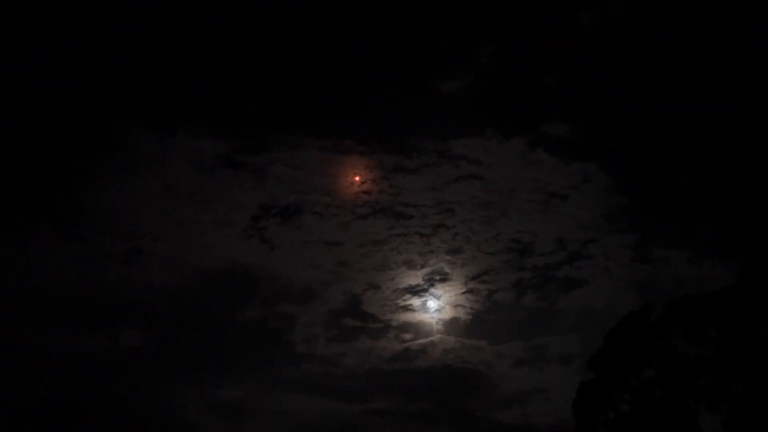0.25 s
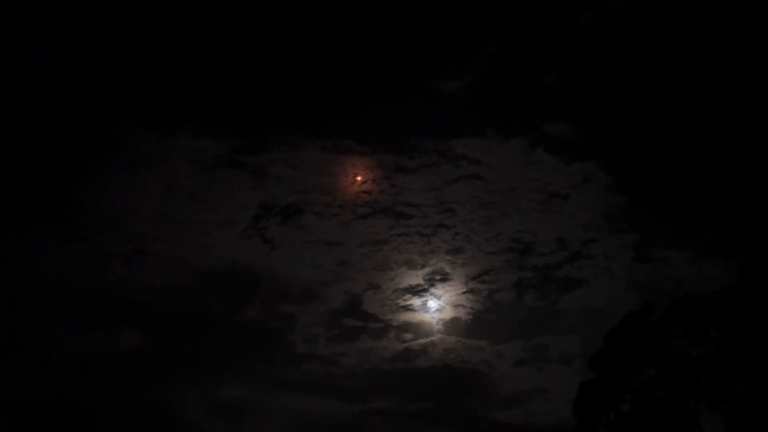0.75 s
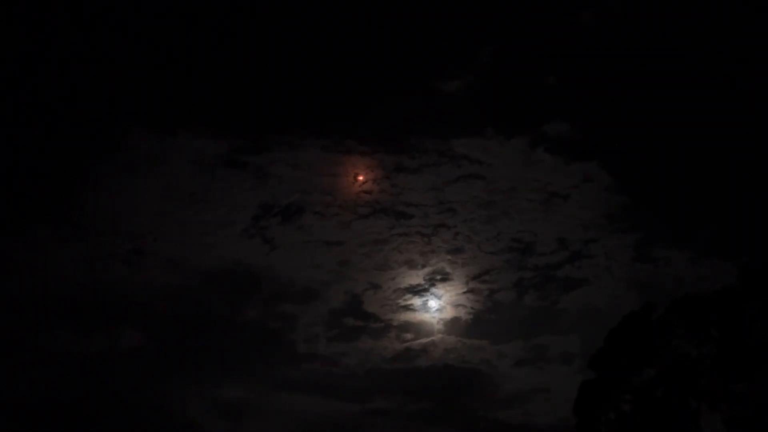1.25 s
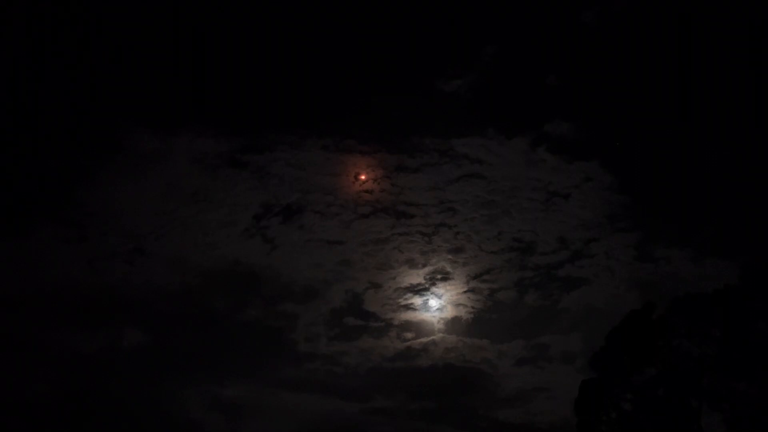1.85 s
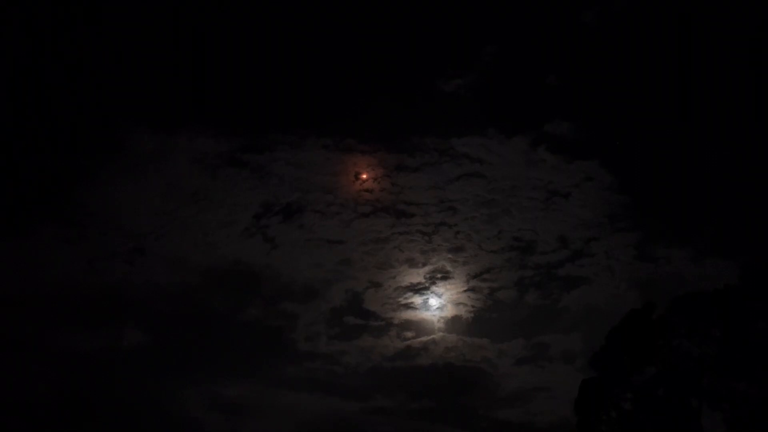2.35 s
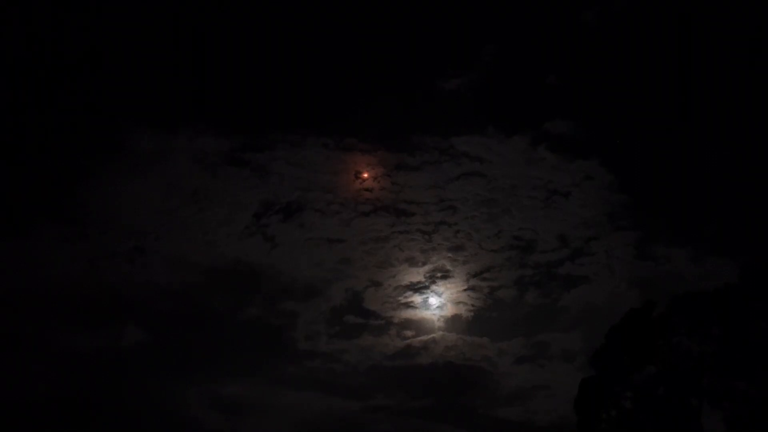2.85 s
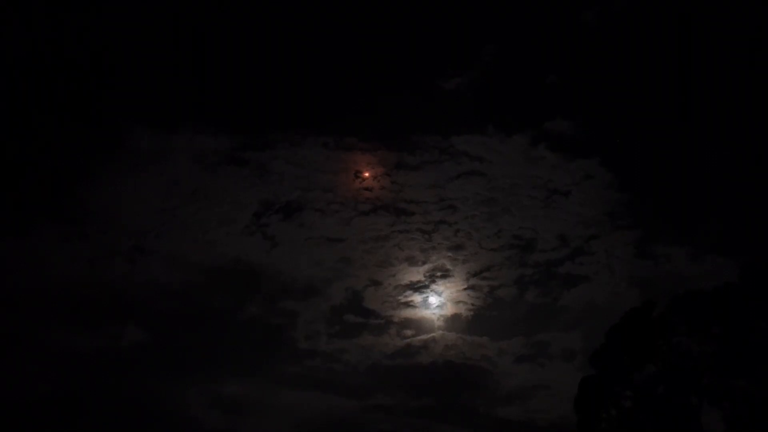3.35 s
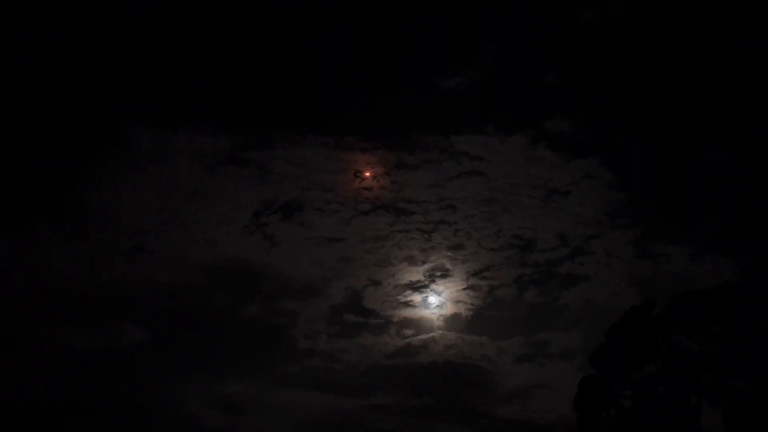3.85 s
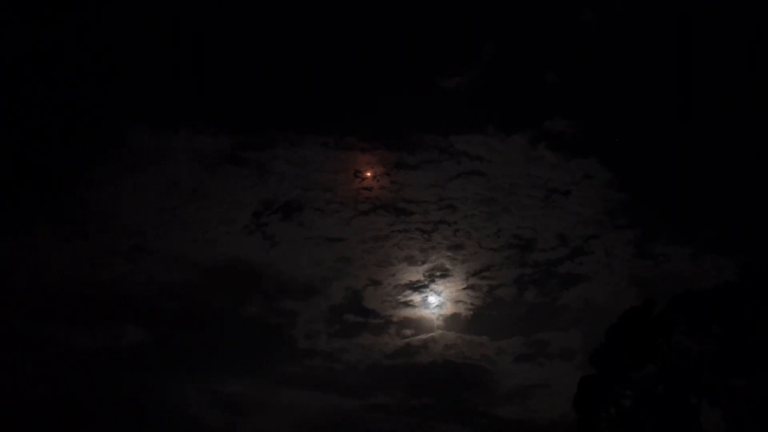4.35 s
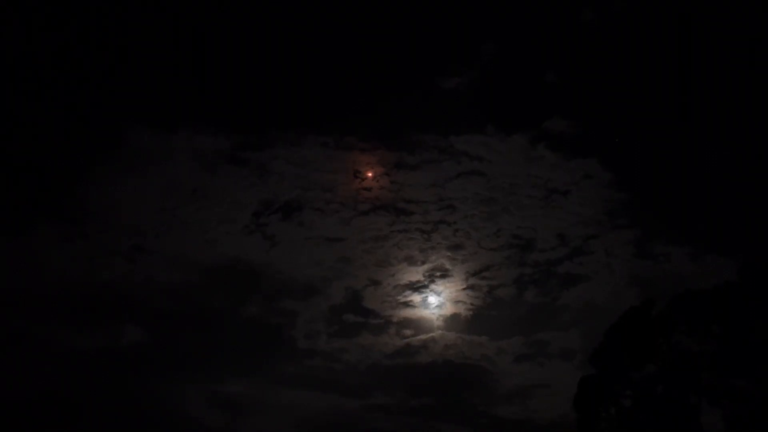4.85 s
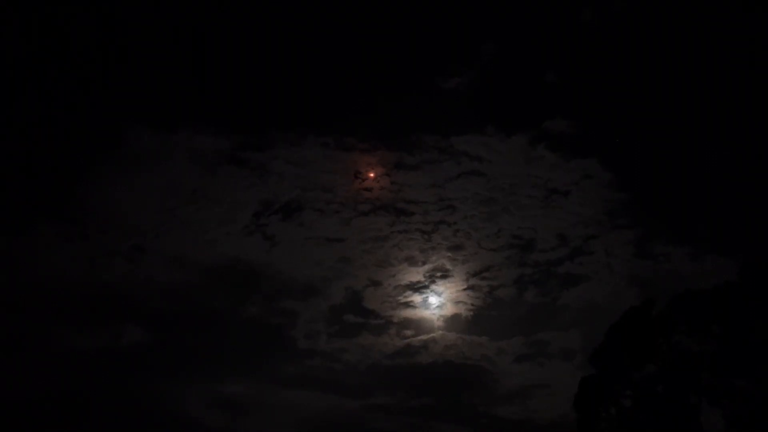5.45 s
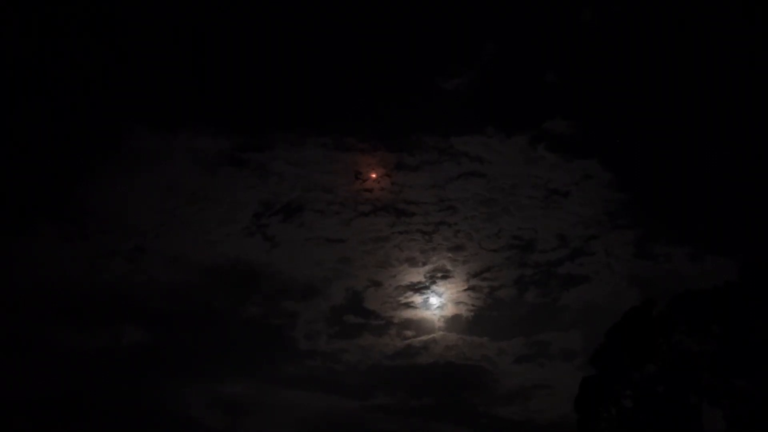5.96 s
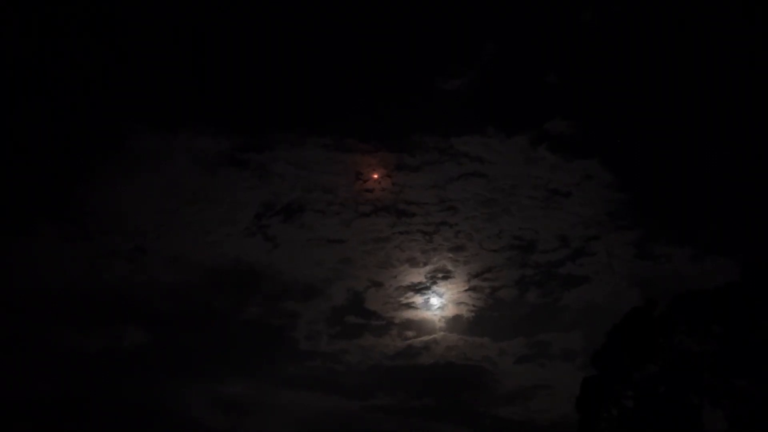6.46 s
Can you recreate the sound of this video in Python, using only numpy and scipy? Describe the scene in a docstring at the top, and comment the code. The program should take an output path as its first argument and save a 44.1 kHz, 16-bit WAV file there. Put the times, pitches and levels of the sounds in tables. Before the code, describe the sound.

A far-off rocket rumbles deep and lumpy through the night, popping and thudding, with faint crickets, thin hiss and a few small close ticks.

```python
"""Distant rocket on a still night

A rocket climbs far away: random exhaust shocks, dulled by miles of air, sum to a deep, lumpy rumble.
The strongest stand out as pops (short pressure swings) and thuds (longer, deeper ones).
Filtered noise makes the faint hiss, steady sines the hum; two crickets chirp in short sine strokes.
A trilling insect is narrow-band noise, and a single falling peep is a gliding sine with breathy noise.
Small ticks close to the microphone are sums of decaying tones; faint scuffs are bursts of noise."""
import sys
import numpy as np
from scipy import signal
from scipy.fft import rfft, irfft
from scipy.io import wavfile
from scipy.ndimage import uniform_filter1d

SR = 44100
rng = np.random.default_rng(int(sys.argv[2]) if len(sys.argv) > 2 else 0)


def waveform_to_disk(signal):
    """Save audio, clipped to [-1, 1], as 16-bit WAV at the path in sys.argv[1]."""
    frames = np.transpose(np.atleast_2d(signal))
    scaled = np.clip(frames, -1, 1) * 32767
    samples = np.round(scaled).astype(np.int16)
    wavfile.write(sys.argv[1], SR, samples)


N = 295911
TIME = np.arange(N) / SR  # [s]


def from_db(db):
    """Level to amplitude: 20 dB is a factor of ten."""
    return 10 ** (np.asarray(db) / 20)


def rms_one(x):
    """Normalisation: scale to unit mean power."""
    return x / np.sqrt(np.mean(x ** 2) + 1e-20)


def in_time(rows):
    """Linear interpolation: read each column of a time curve sample by sample."""
    s, *columns = np.transpose(rows)
    return [np.interp(TIME, s, column) for column in columns]


def at_hz(points, hz):
    """Spectral interpolation: read a table on a logarithmic frequency axis."""
    freqs, values = np.transpose(points)
    return np.interp(np.log(np.maximum(hz, 1)), np.log(freqs), values)


def coloured(x, gain_at):
    """Spectral shaping: multiply the spectrum by a gain and restore unit power."""
    spectrum = rfft(x) * gain_at(np.fft.rfftfreq(N, 1 / SR))
    return rms_one(irfft(spectrum, N))


def narrow_noise(hz, width_hz):
    """Band-limited noise: two independent channels under one Gaussian spectrum."""
    bell = lambda f: np.exp(-2 * ((f - hz) / width_hz) ** 2)
    return coloured(rng.standard_normal((2, N)), bell)


def panned(x, pan_db):
    """Interaural level difference: place a sound by left minus right level."""
    return x * from_db([[pan_db / 2], [-pan_db / 2]])


def delayed(x, lag_s):
    """Propagation delay: the same sound a moment later."""
    return np.interp(TIME - lag_s, TIME, x)


def swell(start, length):
    """Half-sine envelope: one smooth rise and fall of height 1."""
    return np.sin(np.pi * np.clip((TIME - start) / length, 0, 1))


def swing(s, hz, width_s):
    """Gaussian wave packet: one rounded swing of pressure, up and down alike."""
    return np.exp(-((TIME - s) / width_s) ** 2) * np.sin(2 * np.pi * hz * (TIME - s))


def clicks(s, db):
    """Impulse excitation: single-sample pulses at the given times and levels."""
    out = np.zeros(N)
    out[(s * SR).astype(int)] = from_db(db)
    return out


def ring(strikes, hz, t60):
    """Damped resonator: a unit impulse starts a decaying sine of initial height 1."""
    r = from_db(-60 / (t60 * SR))
    w = 2 * np.pi * hz / SR
    # the tiny offset keeps the filter clear of denormal numbers
    return signal.lfilter([0, np.sin(w)], [1, -2 * r * np.cos(w), r * r], strikes + 1e-18)


def evened(x, span_s):
    """Envelope normalisation: hold the slow level at 1 and keep the fast flutter."""
    size = max(int(span_s * SR), 2)
    power = uniform_filter1d(uniform_filter1d(x ** 2, size), size)
    return x / np.sqrt(power + 1e-9)


# slow course of the rumble in three registers:
# (time [s], relative deep boom level [dB], relative roll level [dB], relative dull crackle level [dB])
RUMBLE_COURSE = [(0.0, -18.5, -23, -35), (0.45, -25, -26, -35.5), (0.75, -24.5, -27.5, -32.5),
                 (1.15, -29, -27, -35), (1.9, -27, -28.5, -37), (2.55, -27.5, -29.5, -34.5),
                 (2.95, -25.5, -29, -37.5), (3.85, -26.5, -29.5, -38), (4.6, -28.5, -29.5, -39.0),
                 (5.3, -27, -28, -39.5), (6.71, -25, -31.5, -38.5)]
# the heaviest booms stand out: (centre time [s], lift of the deep boom [dB], length [s])
BOOM_LIFTS = [(0.068, 0.5, 0.1), (0.467, 8, 0.066), (0.754, 6, 0.078), (1.03, 1, 0.15), (1.153, 5.5, 0.055),
              (1.37, 6, 0.067), (1.583, 7.5, 0.16), (2.403, 4.5, 0.05), (2.555, 4, 0.055),
              (2.657, 7.5, 0.053), (3.344, 7.5, 0.17), (4.204, 3.5, 0.22), (5.544, 4, 0.042),
              (6.465, 3.5, 0.11), (6.644, 5.5, 0.11)]
# brief dips; negative values lift:
# (centre time [s], deep boom dip [dB], roll dip [dB], dull crackle dip [dB], length [s])
LULL_DIPS = [(0.179, 8.5, 9, 4, 0.1), (0.937, -3, 11, 0, 0.082), (1.278, -1.5, 9.5, -0.5, 0.2),
             (1.495, 19.5, 0, 2.5, 0.096), (1.783, 11, -0.5, -0.5, 0.11), (1.871, 1, 6.5, -0.5, 0.041),
             (1.958, 16, -2.5, 0.5, 0.074), (2.105, 1, -0.5, 7, 0.076), (2.862, 0.5, 6.5, -0.5, 0.1),
             (3.483, 7, 3, 0, 0.18), (4.068, 12, -2, 2, 0.16), (4.29, 14, 5.5, -0.5, 0.077),
             (4.456, 1.5, -0.5, 3, .06), (4.718, 6, 3, 4, 0.07), (5.043, 4.5, 4, 0, 0.16),
             (5.288, 1, 8.5, 1.5, .11), (5.728, 14, -0.5, 1, 0.068), (5.785, 0.5, 2, 5, 0.061),
             (5.964, 10, -0.5, -1, 0.1), (6.12, 1, 7, 1, 0.066), (6.4, 11, 7, 6, 0.067),
             (6.568, 4.5, 5.5, -0.5, 0.098)]
# a thud swallows the small shocks around it: greatest dip of the roll [dB], length [s]
SWALLOW_DB, SWALLOW_S = 4, .045


def rumble_levels():
    """Level modulation: slow curves in dB, lifted by booms and dented by lulls and around thuds."""
    levels_db = np.array(in_time(RUMBLE_COURSE))
    for s, lift_db, length in BOOM_LIFTS:
        levels_db[0] += lift_db * swell(s - length / 2, length)
    for s, _ in THUD_EVENTS:
        levels_db[1] -= SWALLOW_DB * swell(s - SWALLOW_S / 2, SWALLOW_S)
    for s, *dips_db, length in LULL_DIPS:
        levels_db = levels_db - np.outer(dips_db, swell(s - length / 2, length))
    return levels_db


# spectrum of an exhaust shock after its way through the air:
# (frequency [Hz], relative spectral level [dB per Hz])
SHOCK_SPECTRUM = [(25, -20.5), (36, -8), (47, -0.5), (57, 6.5), (68, -1), (90, -3), (106, -1.5),
                  (130, -9.5), (195, -14), (235, -22), (280, -30), (400, -39.5), (600, -63.5),
                  (1200, -93.5)]
BOOM_TOP_HZ, ROLL_TOP_HZ = 72, 140  # upper edges of the deep boom and of the roll
ROCKET_LAG_S = .00023  # the rumble reaches the right channel this much sooner


def rocket(shocks_per_s, spread_db, even_s, lag_s, pan_db, trim_db):
    """Shot noise: uneven shocks arrive at random; turbulent air makes long and short waves surge apart."""
    sizes = from_db(spread_db * np.minimum(rng.exponential(1, N), 4))
    shocks = sizes * (rng.random(N) < shocks_per_s / SR)
    below = lambda f, edge: 1 / (1 + (f / edge) ** 12)
    shares = [lambda f: below(f, BOOM_TOP_HZ),
              lambda f: below(f, ROLL_TOP_HZ) - below(f, BOOM_TOP_HZ),
              lambda f: 1 - below(f, ROLL_TOP_HZ)]
    roar = 0
    for share, level_db, own_db, span_s in zip(shares, rumble_levels(), trim_db, even_s):
        # the factor -1j makes each shock one swing of pressure, up and down alike
        gain = lambda f: -1j * share(f) * from_db(at_hz(SHOCK_SPECTRUM, f))
        waves = coloured(shocks - shocks.mean(), gain)
        roar = roar + from_db(level_db + own_db) * evened(waves, span_s)
    return panned(np.array([delayed(roar, lag_s), roar]), pan_db)


# spectrum of the night air: (frequency [Hz], relative spectral level [dB per Hz])
AIR_SPECTRUM = [(100, -7.5), (450, 2.5), (800, -2), (1300, -6.5), (1800, -9), (2800, -15), (3850, -14),
                (4750, -22), (5300, -15.5), (5850, -20), (6500, -18.5), (7400, -23), (9500, -26.5),
                (10300, -44), (11500, -31), (14000, -48.5)]
# left-right likeness of the air: (frequency [Hz], correlation [-1 to 1])
AIR_LIKENESS = [(200, 0.83), (470, 0.3), (900, 0.16), (1800, -0.48), (3700, 0.38), (7300, .2),
                (12000, 0.19)]
# course of the breeze, used about its mean: (time [s], relative level [dB])
BREEZE_COURSE = [(0.1, -64), (1.02, -66), (3.43, -63), (4.14, -63.5), (4.61, -62.5), (6.6, -65)]


def night_air(level_db):
    """Partly coherent field: hiss most alike in both ears in the bass; the breeze moves its lower part."""
    alike = lambda f: np.clip(at_hz(AIR_LIKENESS, f), -.99, .99)
    # the powers of sum and difference signals set the correlation of the channels
    gains = lambda f: from_db(at_hz(AIR_SPECTRUM, f)) * np.sqrt([1 + alike(f), 1 - alike(f)])
    mid, side = coloured(rng.standard_normal((2, N)), gains)
    hiss = np.array([mid + side, mid - side])
    low = signal.sosfiltfilt(signal.butter(2, 1800, fs=SR, output="sos"), hiss)
    breeze_db, = in_time(BREEZE_COURSE)
    breeze_gain = from_db(breeze_db - breeze_db.mean())
    return from_db(level_db) * (hiss + low * (breeze_gain - 1))


def rustle(flutter_hz, flutter_db):
    """Random amplitude modulation: a slow noise in dB makes the hiss flicker slightly."""
    flutter = coloured(rng.standard_normal(N), lambda f: np.exp(-(f / flutter_hz) ** 2))
    return from_db(flutter_db * flutter)


# tones of far machinery: (frequency [Hz], relative level [dB])
HUM_TONES = [(771, -73.5), (1067, -79.5), (1541, -83)]


def hum(width_hz, waver, level_db):
    """Narrow-band beating: thin machine tones waver with noise at their own pitch."""
    out = 0
    for hz, db in HUM_TONES:
        tone = np.sqrt(2) * np.sin(2 * np.pi * hz * TIME)
        out = out + from_db(db + level_db) * (tone + waver * narrow_noise(hz, width_hz))
    return out


# course of the trilling insect: (time [s], level of the evened buzz [dB])
TRILL_COURSE = [(0, -74.5), (1.5, -73), (2.4, -73.5), (3.15, -72), (3.18, -110)]


def trill(hz, width_hz, core_hz, core_width_hz, core_db):
    """Narrow-band noise: a far, fine buzz around a thin core grows slightly and stops abruptly halfway."""
    level_db, = in_time(TRILL_COURSE)
    buzz = narrow_noise(hz, width_hz) + from_db(core_db) * narrow_noise(core_hz, core_width_hz)
    return from_db(level_db) * evened(buzz, span_s=0.14)


# the nearer cricket's chirps: (time [s], relative level [dB])
NEAR_CHIRPS = [(.083, -74.5), (.448, -71), (.811, -76.5), (1.172, -74.5), (1.527, -74.5), (1.877, -73),
               (2.27, -76), (2.628, -73.5), (3.005, -73.5), (3.377, -73.5), (3.718, -74), (4.075, -76),
               (4.42, -77), (4.765, -75), (5.24, -75.5), (5.52, -85.5), (5.773, -78)]


def cricket(chirps, hz, pan_db, stroke_s, gap_s, sag_hz, scatter_hz, uneven_db, rasp, echo_db, echo_t60_s):
    """Stridulation: a chirp is two wing strokes, raspy sines of sagging pitch, blurred by scattered echoes."""
    strokes = [(s + delay, db) for s, db in chirps for delay in (0, gap_s)]
    out = np.zeros(N + SR)
    t = np.arange(int(stroke_s * SR)) / SR
    for (s, db), (louder, sharper) in zip(strokes, rng.standard_normal((len(strokes), 2))):
        # t * pitch is the phase, so halving the sag gives the full fall in pitch
        pitch = hz + scatter_hz * sharper + sag_hz * (1 - t / stroke_s) / 2
        stroke = np.sin(np.pi * t / stroke_s) * np.sin(2 * np.pi * t * pitch)
        start = int(s * SR)
        out[start:start + len(t)] += from_db(db + uneven_db * louder) * stroke
    song = out[:N] * (1 + rasp * narrow_noise(60, 90)[0])
    scatter = rng.standard_normal((2, SR // 2)) * from_db(-60 * TIME[:SR // 2] / echo_t60_s)
    echoes = signal.fftconvolve(song[None], scatter)[:, :N]
    return panned(song + from_db(echo_db) * song.std() * rms_one(echoes), pan_db)


# the steepest shocks: (time [s], relative body level [dB], steep front level [dB])
POP_EVENTS = [(0.085, -30.5, -35), (0.201, -37, -34), (0.301, -28.5, -43.5), (.609, -24, -45.5),
              (0.724, -13.5, -31), (.761, -41, -35), (0.8, -20, -45), (0.854, -20.5, -38),
              (0.885, -21, -31.5), (.92, -23.5, -40), (.993, -25, -42), (1.344, -18, -37),
              (1.413, -27, -49), (1.515, -22, -43), (1.571, -31, -40), (1.651, -28.5, -42),
              (2.154, -34, -42.5), (2.23, -29.5, -37), (2.529, -16.5, -45), (2.649, -21.5, -44),
              (2.716, -30, -46), (3.306, -24, -47.5), (3.678, -34, -40.5), (3.868, -25, -48),
              (3.948, -22.5, -48), (4.938, -19.5, -44), (5.179, -27.5, -47), (5.6, -24.5, -37),
              (5.836, -20, -41)]


def pops(hz, width_s, front_hz, front_s, lag_s, pan_db, level_db):
    """Shock rounding: air leaves one short, dull swing of pressure with a steeper, faster one on it."""
    out = 0
    for s, body_db, front_db in POP_EVENTS:
        body = from_db(body_db + level_db) * swing(s, hz, width_s)
        out = out + body + from_db(front_db) * swing(s, front_hz, front_s)
    return panned(np.array([delayed(out, lag_s), out]), pan_db)


# long shocks, heard as single deep thuds: (time [s], relative level [dB])
THUD_EVENTS = [(.111, -13), (.316, -15.5), (0.732, -20), (.997, -15.5), (1.031, -19.5), (1.093, -18.5),
               (1.363, -14), (1.42, -18), (1.922, -16.5), (2.454, -18.5), (2.535, -19), (2.775, -19),
               (3.156, -20), (3.196, -16), (3.395, -20.5), (3.88, -15.5), (4.178, -21), (4.231, -14.5),
               (5.132, -17), (5.183, -15.5), (5.544, -17.5), (5.6, -16.5), (6.216, -20.5), (6.266, -19)]


def thuds(hz, scatter_hz, width_s, lag_s, pan_db, level_db):
    """Loss of the steep front: a long shock is left as one deep swing, each at a slightly different pitch."""
    pitches = hz + scatter_hz * rng.uniform(-1, 1, len(THUD_EVENTS))
    out = 0
    for (s, db), pitch in zip(THUD_EVENTS, pitches):
        out = out + from_db(db + level_db) * swing(s, pitch, width_s)
    return panned(np.array([delayed(out, lag_s), out]), pan_db)


# faint scuffs, and the breathy noise of the peep at 3.96 s:
# (time [s], relative level [dB], centre frequency [Hz], length [s])
NOISE_BURSTS = [(0.491, -75, 5830, 0.018), (2.264, -73, 5030, 0.013), (2.265, -84, 11700, 0.011),
                (2.595, -84, 10400, 0.023), (3.96, -76, 3800, .03), (4.154, -84, 10500, .025),
                (5.585, -75, 9000, 0.022), (5.896, -77, 4000, 0.016), (6.01, -83, 8600, 0.025)]


def scuffs_and_breath(width_hz, level_db):
    """Enveloped noise: brief band-limited bursts make the scuffs and the breathy part of the peep."""
    out = 0
    for s, db, hz, length in NOISE_BURSTS:
        burst = swell(s - length / 4, length) * narrow_noise(hz, width_hz)
        out = out + from_db(db + level_db) * burst
    return out


# close ticks, all levels relative:
# (time [s], low knock level [dB], bright 8 kHz edge level [dB], dry crack level [dB])
TICK_EVENTS = [(0.8294, -35.5, -34, -32.5), (1.746, -62, -73, -48), (5.128, -34.5, -30.5, -34.5),
               (5.263, -52, -75, -49), (5.5817, -56, -56, -42), (5.585, -38, -48, -34),
               (5.5905, -42, -52, -44), (5.598, -55, -63, -48), (5.8972, -47, -59, -46),
               (6.101, -76, -53, -52)]
# tones that make up the ticks: (frequency [Hz], relative level [dB], 60 dB decay time [s], left minus right [dB])
TICK_TONES = [(550, -11.5, 0.015, 2), (865, -0.5, 0.0055, -3.5), (1350, 0, 0.0092, -5.5),
              (1960, -6, 0.0072, -8.5), (2440, -15.5, 0.004, -9), (8130, -7.5, 0.011, -13),
              (8550, -6, 0.0029, -15), (9700, -12, 0.0013, -10.5)]


def ticks(level_db, knock_after_s, left_lag_s, top_hz, uneven_db):
    """Sum of decaying tones: each tick is a low knock just after a bright 8 kHz edge."""
    s, knock_db, edge_db, _ = np.transpose(TICK_EVENTS)
    out = 0
    for k, (hz, tone_db, t60, pan_db) in enumerate(TICK_TONES):
        when, strike_db = (s + knock_after_s, knock_db) if hz < 4000 else (s, edge_db)
        strikes = clicks(when, tone_db + strike_db + uneven_db * rng.standard_normal(len(s)))
        # neighbouring tones swing in opposite directions
        out = out + (-1) ** k * panned(ring(strikes, hz, t60), pan_db)
    # soften the very top
    out = signal.sosfilt(signal.butter(8, top_hz, fs=SR, output="sos"), out)
    return from_db(level_db) * np.array([delayed(out[0], left_lag_s), out[1]])


def cracks(low_hz, top_hz, pan_db, level_db):
    """Broadband transient: band-passed impulses give each tick its dry onset."""
    s, _, _, crack_db = np.transpose(TICK_EVENTS)
    band = signal.butter(4, [low_hz, top_hz], "band", fs=SR, output="sos")
    return panned(signal.sosfilt(band, clicks(s, crack_db + level_db) + 1e-18), pan_db)


def pip(start, length_s, hz, fall_hz, rasp, level_db):
    """Frequency glide: one short, falling peep in the distance, made slightly hoarse by noise."""
    pitch = hz - fall_hz * np.clip((TIME - start) / length_s, 0, 1)
    tone = np.sin(2 * np.pi * np.cumsum(pitch) / SR) + rasp * narrow_noise(hz, 300)
    return from_db(level_db) * swell(start, length_s) * tone


# a farther cricket joins in at an even pace: (time [s], relative level [dB])
DISTANT_CHIRPS = [(4.99 + .256 * k, -77.5) for k in range(7)]


def far_cricket(level_db):
    """Reverberant field: chirps so distant that their echoes merge into a faint shimmer."""
    song = cricket(DISTANT_CHIRPS, hz=6820, pan_db=5, stroke_s=.045, gap_s=.045, sag_hz=90,
                   scatter_hz=60, uneven_db=1.5, rasp=.5, echo_db=6, echo_t60_s=.9)
    return from_db(level_db) * song


def scene():
    """Superposition: the rumble over the small sounds of the night."""
    roar = rocket(shocks_per_s=750, spread_db=2.5, even_s=[.05, .07, .1], lag_s=ROCKET_LAG_S,
                  pan_db=0.76, trim_db=[-.3, -.2, -.4])
    background = night_air(level_db=-62.0) * rustle(flutter_hz=25, flutter_db=0.99)
    background = background + hum(width_hz=17, waver=0.72, level_db=-1.5)
    insects = trill(hz=2060, width_hz=210, core_hz=2072, core_width_hz=40, core_db=-7)
    insects = insects + cricket(NEAR_CHIRPS, hz=7110, pan_db=-10.5, stroke_s=0.032, gap_s=.049, sag_hz=25,
                                scatter_hz=10, uneven_db=0.0, rasp=.2, echo_db=-10, echo_t60_s=.25)
    roar = roar + pops(hz=172, width_s=0.0055, front_hz=293, front_s=0.0019, lag_s=ROCKET_LAG_S,
                       pan_db=1.0, level_db=-2.5)
    roar = roar + thuds(hz=95.3, scatter_hz=6.7, width_s=.012, lag_s=ROCKET_LAG_S,
                        pan_db=1.0, level_db=-1.5)
    small = scuffs_and_breath(width_hz=2300, level_db=8.5)
    small = small + ticks(level_db=-1.5, knock_after_s=0.00055, left_lag_s=0.000098,
                          top_hz=10800, uneven_db=1.6)
    small = small + cracks(low_hz=2200, top_hz=9400, pan_db=-7, level_db=1.0)
    peep = pip(start=3.955, length_s=0.036, hz=1550, fall_hz=60, rasp=.4, level_db=-59.5)
    insects = insects + far_cricket(level_db=-3.5)
    return roar + background + insects + small + peep


LOW_CUT_HZ, CUTOFF_HZ = 36, 15100  # high-pass corner and low-pass stopband edge


def record(dry):
    """Band limitation: the microphone loses the lowest rumble and the top; a very short fade ends the sound."""
    low_cut = signal.butter(6, LOW_CUT_HZ, "high", fs=SR, output="sos")
    sound = signal.sosfiltfilt(low_cut, dry, padlen=SR // 10)
    fade = np.clip((TIME[-1] - TIME) / .008, 0, 1)
    top_cut = signal.cheby2(12, 70, CUTOFF_HZ, fs=SR, output="sos")
    return signal.sosfilt(top_cut, sound * fade)


dry = scene()
out = record(dry)
waveform_to_disk(out)
```